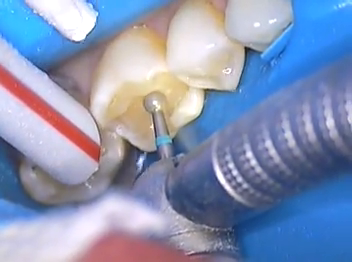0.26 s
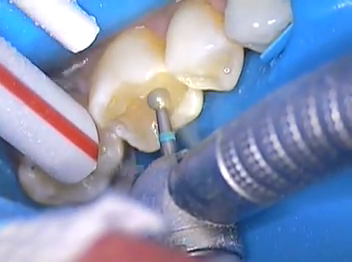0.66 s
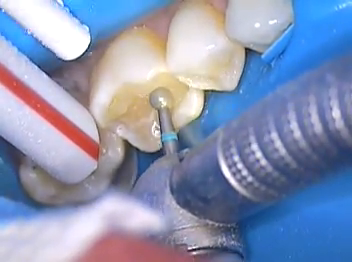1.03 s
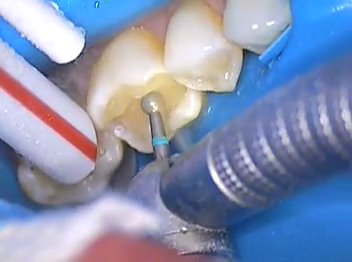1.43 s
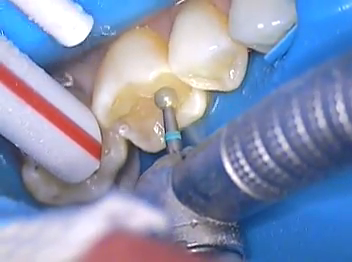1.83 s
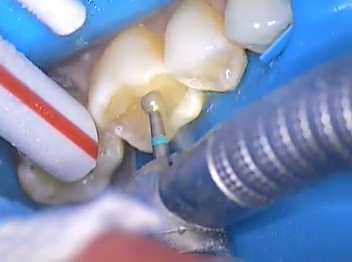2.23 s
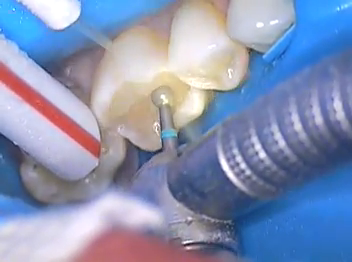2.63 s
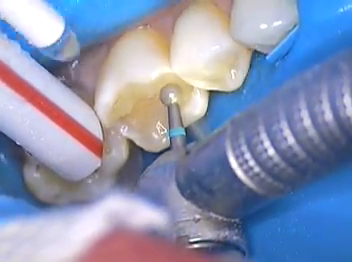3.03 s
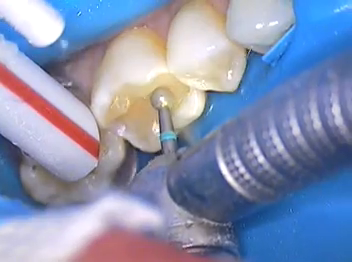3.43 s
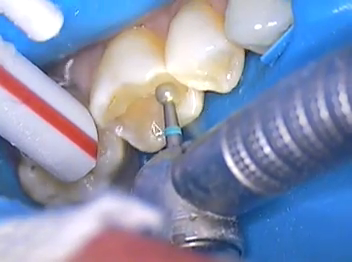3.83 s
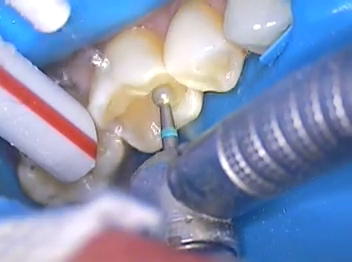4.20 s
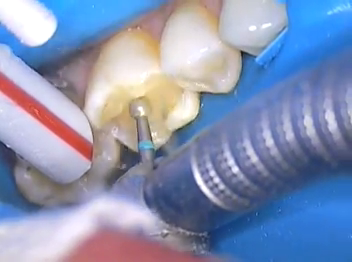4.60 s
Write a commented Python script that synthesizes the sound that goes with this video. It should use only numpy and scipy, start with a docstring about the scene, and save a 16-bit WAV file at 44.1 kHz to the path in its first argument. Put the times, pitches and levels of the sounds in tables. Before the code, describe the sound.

A steady, bright air and water hiss with a thin dental drill whine sagging in pitch as it cuts, plus faint gurgles and spits.

```python
"""An air-turbine dental drill cuts a tooth: a near sine whines at rotor speed, slowing under load,
and a rougher tone, a narrow noise band, rides above it in each bite.
A suction hose and the cooling spray hiss: noise through fixed resonances. Water gurgles in the hose as
lumpy low noise, and spray spits in short bright bursts. One microphone catches draught as rumble,
sway and air pops; its output carries a small offset."""
import sys
import numpy as np
from scipy import signal
from scipy.fft import rfft, irfft
from scipy.io import wavfile
from scipy.ndimage import uniform_filter1d

SR = 44100
rng = np.random.default_rng(int(sys.argv[2]) if len(sys.argv) > 2 else 0)


def pcm_store(signal):
    """Save signal as 16-bit PCM."""
    levels = np.round(np.clip(np.atleast_2d(signal), -1, 1) * 32767)
    wavfile.write(sys.argv[1], SR, levels.astype(np.int16).T)


def volts_from_db(level):
    """Convert decibel levels to linear amplitude ratios."""
    exponent = np.asarray(level, float) / 20
    return 10 ** exponent


N = 209739  # samples

# Rotor whine. Each row: time in seconds, tone in Hz.
ROTOR_TONE = [(0.02, 8367), (0.08, 8235), (0.15, 8360), (0.26, 8375), (0.45, 7456), (0.51, 7330),
              (0.61, 7488), (0.73, 8013), (0.8, 8100), (0.88, 8030), (0.93, 8183), (0.99, 8185),
              (1.09, 7767), (1.16, 7680), (1.41, 8155), (1.58, 7988), (1.6, 8092), (1.71, 7866),
              (1.84, 7162), (1.96, 6941), (2.05, 7109), (2.11, 7412), (2.13, 7283), (2.32, 7022),
              (2.51, 6926), (2.62, 7025), (2.73, 6922), (2.87, 7078), (2.96, 7301), (3.05, 7400),
              (3.26, 7364), (3.3, 7065), (3.37, 6865), (3.65, 6660), (3.77, 6515), (3.84, 6495),
              (3.95, 6355), (4.18, 6495), (4.47, 6151), (4.55, 5770)]
# Whine loudness by pitch; reflections cancel it near some pitches. Each row: tone in Hz, level in dB.
WHINE_PATH = [(5750, -66), (6050, -52), (6280, -52), (6560, -43), (6760, -56), (6950, -41.5), (7250, -38),
              (7370, -43), (7490, -57), (7620, -43), (8000, -41), (8200, -39.5), (8360, -41.5)]
# Rougher tone while the burr bites. Each row: peak in seconds, level in dB, swell in seconds.
BITES = [(2.36, -43, .16), (3.33, -45, .05)]
# Air flow. Each row: time in seconds, suction level in dB, spray level in dB.
AIR_FLOW = [(0, -35.5, -35.3), (.6, -35, -35), (1.2, -35, -35), (2, -35.5, -35), (3.2, -35, -35.5),
            (3.8, -34.8, -35), (4.45, -35.2, -35), (4.76, -35, -33.8)]
# Hiss spectrum before the resonances. Each row: frequency in Hz, relative density in dB per Hz.
HISS_SPECTRUM = [(250, -29.5), (950, -20.5), (1400, 8), (2000, -13), (3200, 1.5), (4000, -13), (4700, 8),
                 (6200, -5.5), (8400, -1.5), (10200, -5.5), (12300, -9.5), (13600, -17.5), (13900, -31)]
# Resonances and nulls of hose, mouth and walls. Each row: centre in Hz, width in Hz, gain in dB.
HOSE_RESONANCES = [(440, 60, 5), (570, 40, 4), (1000, 60, 14), (1010, 90, -12), (1220, 190, -6),
                   (1380, 60, -10), (1520, 170, -7), (1640, 40, 2), (1710, 70, -6), (1880, 180, -8),
                   (2080, 60, -5), (2230, 70, -6), (2370, 120, -3), (2930, 90, -8), (3030, 70, -5),
                   (3440, 40, 4), (3700, 80, 5), (3850, 80, 6), (4010, 60, 5), (4050, 40, -4),
                   (4110, 60, 5), (4880, 800, -7), (6060, 900, -9), (7160, 540, -5), (8540, 150, 3),
                   (8920, 280, -3), (10110, 330, -7), (10520, 360, -6), (11040, 90, -4), (11460, 180, -3)]
# Steady water in the hose. Each row: time in seconds, level in dB.
GURGLE_LEVEL = [(0, -77), (.5, -70), (1.15, -63), (1.5, -59), (2.2, -61), (2.9, -75), (3.5, -65),
                (4, -61.5), (4.76, -63.5)]
# Gurgle spectrum. Each row: frequency in Hz, relative density in dB per Hz.
GURGLE_SPECTRUM = [(60, -64), (150, -18), (250, -13.5), (400, -11.5), (465, -1), (520, -13.5), (575, -1),
                   (650, -10.5), (900, -8), (1300, 0.5), (2000, -14)]
# Slugs of water sucked through. Each row: end in seconds, level in dB, length in seconds.
SLUGS = [(1.69, -62, .06), (2.71, -61, .05), (3.22, -59, .05), (3.79, -53.5, .2), (3.88, -57, .03),
         (4.47, -62, .05)]
# Draught rumble on the microphone. Each row: time in seconds, level in dB.
RUMBLE_LEVEL = [(0, -82), (.8, -75.5), (.9, -87), (1.28, -92), (1.35, -81), (1.9, -70), (2.15, -72),
                (2.5, -91), (2.7, -94), (2.78, -79), (3.4, -82), (3.52, -71), (3.9, -75), (3.96, -92),
                (4.4, -88), (4.76, -78)]
# Sway spectrum. Each row: frequency in Hz, relative density in dB per Hz.
SWAY_SPECTRUM = [(3, -5), (20, -0.5), (35, -22), (60, -13.5), (80, -24), (110, -46), (200, -58), (300, -53),
                 (400, -58)]
# Air puffs on the microphone. Each row: centre in seconds, signed peak, centre-to-peak time in seconds.
POPS = [(0.281, -0.0036, 0.0012), (0.379, -.0013, 0.0012), (1.574, .0019, 0.0013), (1.6527, 0.0044, 0.0017),
        (1.8452, 0.013, 0.0013), (2.3914, -0.0064, 0.0013), (2.9394, -0.0012, 0.00076),
        (3.515, -.0036, 0.0013), (4.6568, -.002, 0.001), (4.7433, .005, 0.0013)]
# Spits of spray. Each row: start in seconds, peak level in dB, start-to-peak time in seconds.
SPITS = [(1.4462, -30, .003), (3.218, -43, .004)]
# Spit spectrum. Each row: frequency in Hz, relative density in dB per Hz.
SPIT_SPECTRUM = [(2000, -33), (3300, -6), (6000, -34), (8000, -4), (9300, 1.5), (10500, -12), (12600, -4.5),
                 (13800, -22)]

T_S = np.arange(N) / SR
BIN_HZ = np.maximum(np.arange(N // 2 + 1) * SR / N, 1)


def rms_one(x):
    """Scale to unit rms."""
    return x / np.sqrt(np.mean(x ** 2) + 1e-20)


def in_time(rows):
    """Table columns joined by straight lines in time."""
    time_s, *columns = np.transpose(rows)
    return [np.interp(T_S, time_s, column) for column in columns]


def at_hz(points):
    """Spectrum table read on a log-frequency axis, closed above its top."""
    hz, db = np.transpose(points)
    return np.interp(np.log(BIN_HZ), np.log(hz), db, right=-120)


def coloured(db):
    """Fresh white noise given a spectrum in dB."""
    return irfft(rfft(rng.standard_normal(N)) * volts_from_db(db), N)


def drift(rate_hz):
    """Slow random signal of unit rms, low-passed at rate_hz, drawn at every 64th sample."""
    size = N // 64 + 2
    hz = np.arange(size // 2 + 1) * SR / 64 / size
    slow = irfft(rfft(rng.standard_normal(size)) / (1 + (hz / rate_hz) ** 2), size)
    return np.interp(np.arange(N) / 64, np.arange(size), rms_one(slow))


def swell(start_s, end_s, rise_s, fall_s):
    """Envelope with Gaussian flanks: rises to 1 at the start, holds, falls after the end."""
    before = np.maximum(start_s - T_S, 0) / rise_s
    after = np.maximum(T_S - end_s, 0) / fall_s
    return np.exp(-before ** 2 - after ** 2)


def bite_tone(phase, ratio=1.135, width_hz=25, release_s=.04):
    """Narrow noise band at a fixed ratio to the rotor tone, swelling as the burr bites."""
    band = drift(width_hz) * np.cos(ratio * phase) + drift(width_hz) * np.sin(ratio * phase)
    level = sum(volts_from_db(db) * swell(s, s, rise_s, release_s) for s, db, rise_s in BITES)
    return band * level


def turbine(inertia_s=.045, wobble_hz=4.0, flutter_db=1.6, load_db_per_khz_s=.7, fade_db_per_s=-2.1):
    """Near sine smoothed by rotor inertia; louder as the cut brakes it, fainter as the burr sinks in."""
    inertia = int(inertia_s * SR)
    hz = uniform_filter1d(in_time(ROTOR_TONE)[0], inertia, mode="nearest")
    phase = 2 * np.pi * np.cumsum(hz + wobble_hz * drift(25.4)) / SR
    braking_khz_s = -uniform_filter1d(np.gradient(hz) * SR / 1000, inertia, mode="nearest")
    level_db = np.interp(hz, *np.transpose(WHINE_PATH))
    level_db = level_db + load_db_per_khz_s * braking_khz_s + fade_db_per_s * T_S
    whine = np.sqrt(2) * volts_from_db(level_db + flutter_db * drift(25)) * np.sin(phase)
    return whine + bite_tone(phase)


def hiss(shared_db=0.42, own_db=0.32, fast_db=0.55, patch_db=4.5, side_db=-41, spray_from_hz=6100):
    """Turbulent air through hose resonances; each band flickers partly with the flow, partly alone."""
    shape_db = at_hz(HISS_SPECTRUM)
    for hz, width_hz, gain_db in HOSE_RESONANCES:
        shape_db = shape_db + gain_db / (1 + (2 * (BIN_HZ - hz) / width_hz) ** 2)
    edges_hz = [200, 1000, 1700, 2200, 2900, 3500, 4050, 5000, 6100, 7200, 8000, 8900, 9500, 10200,
                11500, 12800, 14000]
    flow = drift(16)
    spectrum = rfft(rms_one(coloured(shape_db)))
    suction_db, spray_db = in_time(AIR_FLOW)
    mid, side = 0, 0
    for low, high in zip(edges_hz, edges_hz[1:]):
        band = irfft(spectrum * ((BIN_HZ >= low) & (BIN_HZ < high)), N)
        level_db = spray_db if low >= spray_from_hz else suction_db
        flicker_db = shared_db * flow + own_db * drift(6) + fast_db * drift(33)
        mid = mid + band * volts_from_db(level_db + flicker_db)
        # side: a very faint, fluctuating channel difference; time reversal makes it unlike mid
        if low > 1500:
            difference_db = side_db + 2.5 * np.log2(low / 2000) + patch_db * drift(20)
            side = side + band[::-1] * volts_from_db(level_db + difference_db)
    return mid, side


def gurgle(lumpy_db=2.5, slug_fall_s=.02):
    """Water rattles low in the hose: lumpy noise, swelling with each slug."""
    level = volts_from_db(in_time(GURGLE_LEVEL)[0])
    for end_s, db, length_s in SLUGS:
        level = level + volts_from_db(db) * swell(end_s - length_s / 2, end_s, length_s / 2, slug_fall_s)
    return level * volts_from_db(lumpy_db * drift(27)) * rms_one(coloured(at_hz(GURGLE_SPECTRUM)))


def draught(lumpy_db=3.0, sway_db=-61):
    """Moving air pushes the diaphragm: lumpy rumble, slow sway and single-cycle pops."""
    rumble_band = signal.butter(2, [80, 220], "band", fs=SR, output="sos")
    rumble = rms_one(signal.sosfilt(rumble_band, rng.standard_normal(N)))
    out = volts_from_db(in_time(RUMBLE_LEVEL)[0] + lumpy_db * drift(17)) * rumble
    out = out + volts_from_db(sway_db) * rms_one(coloured(at_hz(SWAY_SPECTRUM)))
    for centre_s, height, half_width_s in POPS:
        u = (T_S - centre_s) / half_width_s
        out = out + height * 16 / 9 * u / (1 + u ** 2 / 3) ** 2  # 16/9 makes the peak equal height
    return out


def spits():
    """Spray spits: bright noise bursts that rise fast and die away."""
    level = 0
    for start_s, db, rise_s in SPITS:
        age = np.maximum(T_S - start_s, 0) / rise_s
        level = level + volts_from_db(db) * age * np.exp(1 - age)
    return level * rms_one(coloured(at_hz(SPIT_SPECTRUM)))


def scene():
    """One microphone feeds both channels; they differ only by a very faint side signal."""
    air, side = hiss()
    mid = turbine() + air + gurgle() + draught() + spits()
    return np.array([mid + side, mid - side])


def low_pass(x):
    """Removes everything above the highest recorded frequency."""
    return signal.sosfilt(signal.butter(12, 14500, fs=SR, output="sos"), x)


def record(dry):
    """The microphone output carries a small constant offset."""
    offset = .0042  # of full scale
    mix = dry + offset
    return low_pass(mix)


dry = scene()
out = record(dry)
pcm_store(out)
```